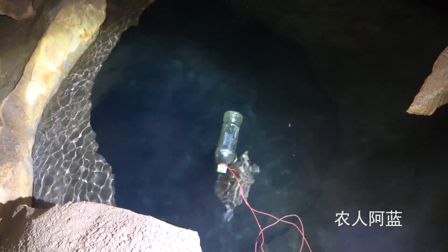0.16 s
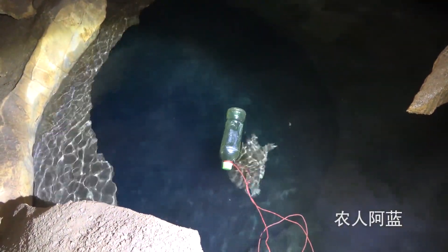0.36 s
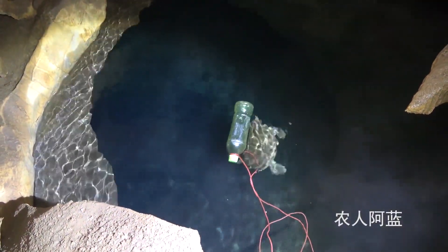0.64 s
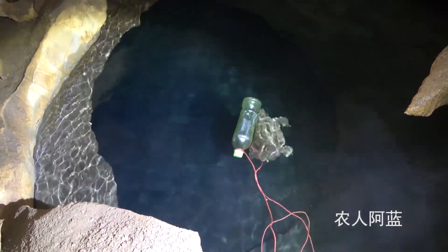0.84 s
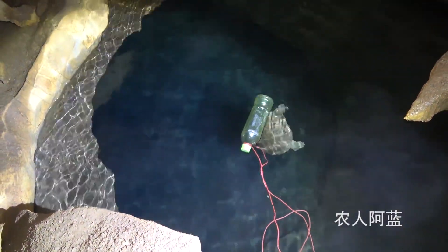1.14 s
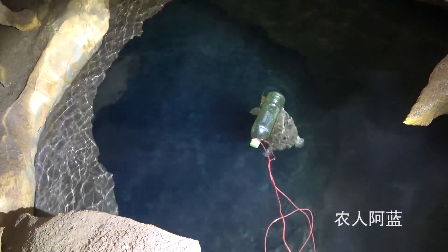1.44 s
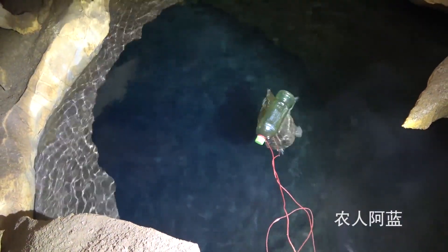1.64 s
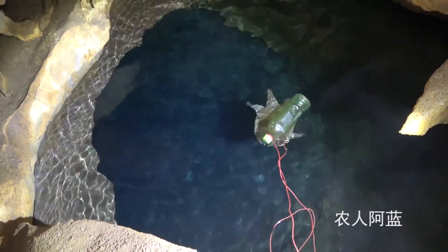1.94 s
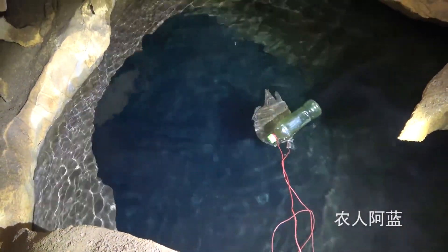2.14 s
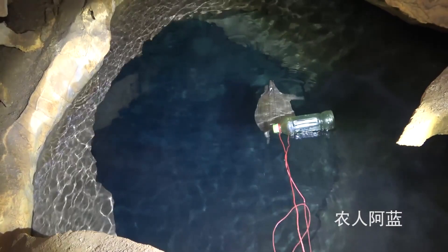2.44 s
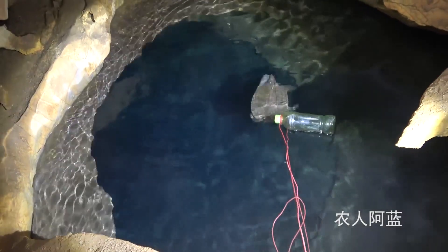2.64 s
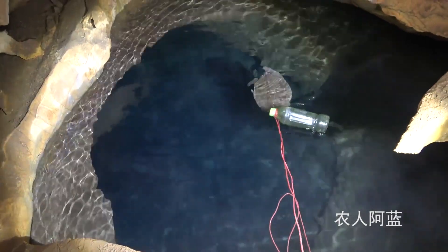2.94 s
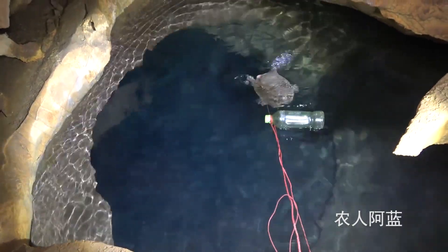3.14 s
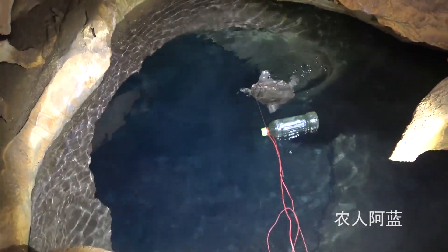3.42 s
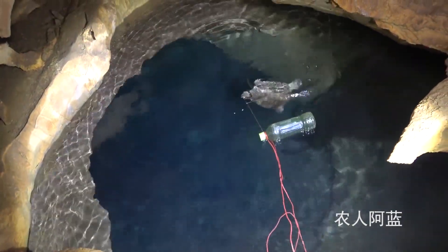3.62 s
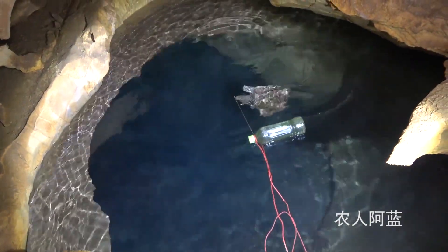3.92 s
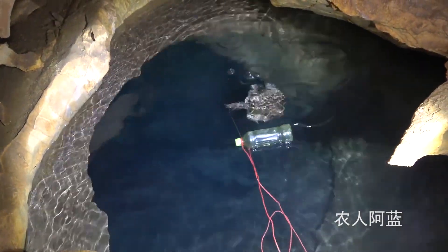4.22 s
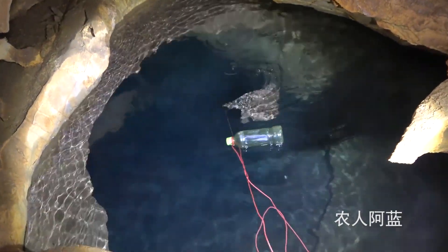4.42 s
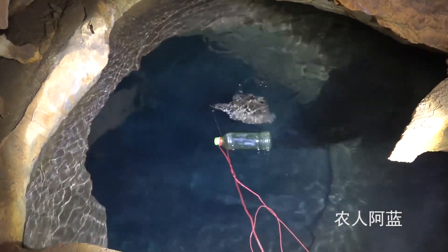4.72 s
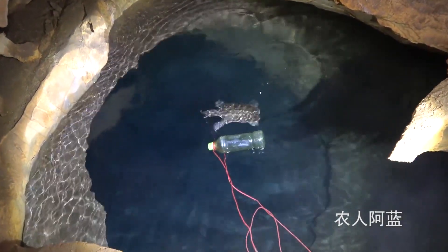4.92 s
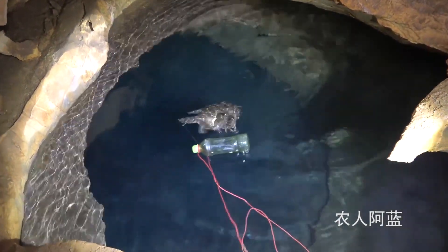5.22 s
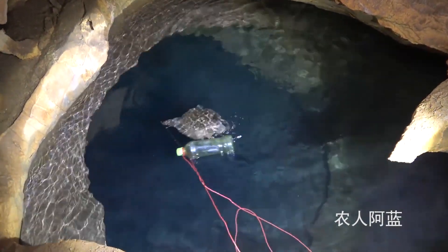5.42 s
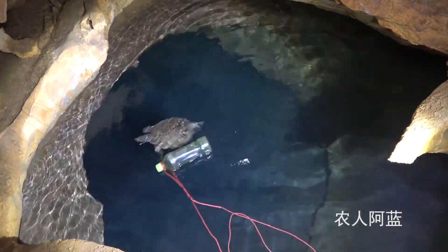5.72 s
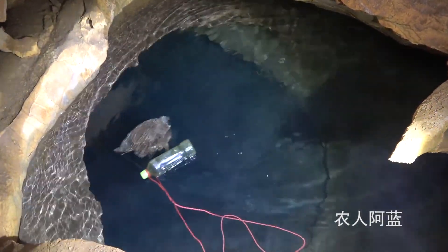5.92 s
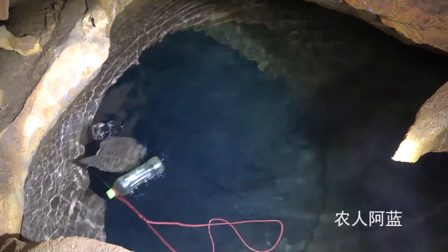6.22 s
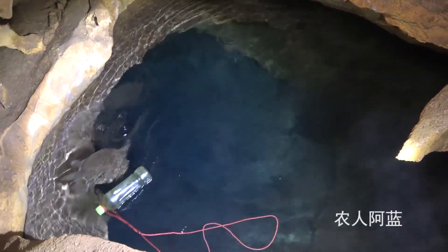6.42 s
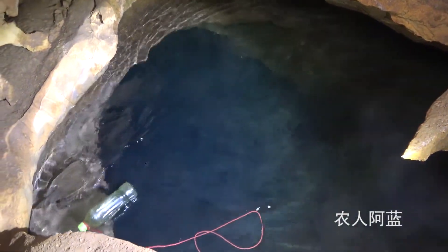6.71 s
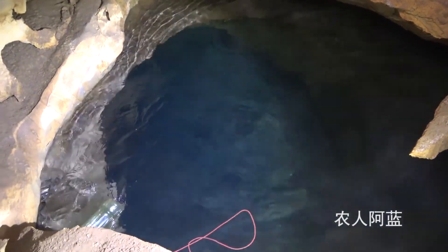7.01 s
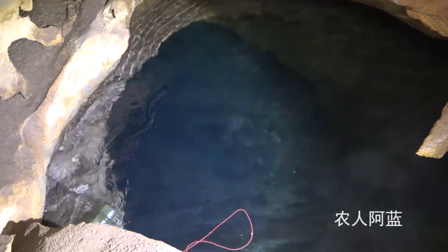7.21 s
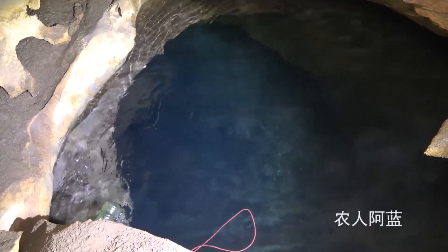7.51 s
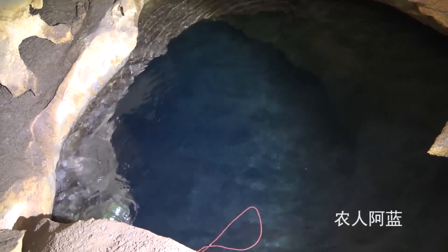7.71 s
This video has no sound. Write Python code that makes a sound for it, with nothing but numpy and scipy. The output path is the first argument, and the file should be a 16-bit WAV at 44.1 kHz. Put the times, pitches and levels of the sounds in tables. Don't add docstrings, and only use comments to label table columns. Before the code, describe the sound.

Water drips, bubbles and plops echo tightly in a rocky hollow as a turtle's strokes break a quiet pool in short bursts.

```python
import sys
import numpy as np
from scipy import signal
from scipy.io import wavfile
from scipy.ndimage import uniform_filter1d

SR = 44100
rng = np.random.default_rng(int(sys.argv[2]) if len(sys.argv) > 2 else 0)


def boost(x):
    u = np.asarray(x, float) / 20
    return 10 ** u


def store_wav(level_fs):
    pcm = np.round(np.clip(np.atleast_2d(level_fs), -1, 1) * 32767)
    wavfile.write(sys.argv[1], SR, pcm.T.astype(np.int16))


N = 346493


def bubble(db, hz, cycles, rise, pan_db, swell_db, bend, neck_cycles, snap_db=-60):
    life = np.arange(0, 1, hz / SR / np.clip(cycles, 2, 300))
    pitch = np.minimum(hz * (1 + rise * life ** bend), SR / 2.6)
    closing = np.minimum((life * cycles + 0.23) / neck_cycles, 1)
    dying = np.minimum((1 - life) * cycles / 1.2, 1)
    level = boost(swell_db * life) * closing * dying
    ring = level / level.max() * np.sin(2 * np.pi * np.cumsum(pitch) / SR)
    ring = np.append(ring, np.zeros(200))
    u = np.arange(1, len(ring) + 1) * hz / SR * 5.5
    snap = boost(snap_db) * np.e * u * np.exp(-u)
    sound = above(ring, 0.94 * hz) + above(snap, 1.05 * hz)
    return boost(db) * sides(pan_db)[:, None] * sound


def above(x, hz):
    return signal.sosfilt(signal.butter(7, min(hz, SR / 2.2), "high", fs=SR, output="sos"), x)


def lean(hz):
    return -1 + 1.5 * abs(np.log2(hz / 1600))


def sides(pan_db):
    return boost(np.array([pan_db / 2, -pan_db / 2]))


def plink(db, hz, cycles, snap_db):
    return bubble(db, hz, cycles, 0.44, lean(hz), -17.0, 2.5, 0.68, snap_db)


# start in seconds, peak level in dB, pitch in Hz, life in cycles, snap in dB.
SMALL_BUBBLES = [(0.1917, -33, 5320, 27, 13), (0.9761, -37, 9700, 10, 15.5), (1.261, -37, 2900, 8, 6),
                 (1.3464, -45, 6050, 8.2, 23), (2.1465, -27, 4490, 21, 11), (2.3087, -31, 8200, 14, 8),
                 (3.203, -39, 6350, 9.7, 13), (3.248, -27.5, 4810, 20, 5), (3.3066, -22, 6900, 14, 24),
                 (4.0376, -23, 4770, 11.6, 6), (4.213, -25, 11500, 9, 9), (4.3803, -25, 4470, 20, 10),
                 (5.3806, -31, 7800, 12, 6), (5.68, -23, 15000, 6.2, 22), (6.3942, -37.5, 6200, 10, 20),
                 (6.413, -25.5, 4330, 17, 11.5), (6.4437, -33, 4770, 15.6, 15.5),
                 (6.612, -30.5, 12800, 5.8, 22), (6.712, -34.5, 4330, 14, 11.5), (6.77, -30, 8900, 12, 14),
                 (7.1036, -25, 6630, 12.5, 12), (7.274, -32, 6750, 13, 12.5),
                 (7.4897, -40, 3950, 7.9, 19.5), (7.5836, -17.5, 9170, 3.6, 6)]
# start in seconds, peak level in dB, pitch in Hz, life in cycles, snap in dB.
MIDDLE_BUBBLES = [(0.807, -21.5, 1696, 17, 2.5), (1.108, -51, 1400, 6, -6), (2.676, -34, 1650, 6.4, 5),
                  (2.688, -43.5, 1356, 32, -1), (2.866, -43, 1520, 33, 10), (3.2045, -36, 1386, 25, 10),
                  (3.2385, -29, 1460, 12.2, -13), (3.271, -40, 1620, 19, 4), (3.297, -38, 1560, 13, 17.5),
                  (3.33, -38, 1010, 5.8, 17), (4.138, -43, 1900, 8.3, 9), (4.28, -39.5, 1380, 30, 6),
                  (4.324, -32.5, 1450, 8.5, -1), (5.386, -41.5, 1230, 13, 12), (6.3464, -52, 1315, 16, 6),
                  (6.3669, -32.5, 1873, 15, -24), (7.2677, -41, 1133, 17, 16), (7.2833, -37, 1390, 16, 5),
                  (7.299, -53, 1170, 15, 9), (7.6099, -40, 1066, 17, 8)]


def pinched_bubbles():
    return [(s, plink(db - 5.5, *shape)) for s, db, *shape in SMALL_BUBBLES + MIDDLE_BUBBLES]


# start in seconds, peak level in
# dB, pitch in Hz, snap in dB.
FAINT_BUBBLES = [(0.358, -51, 6300, 14), (1.2345, -47, 10600, 10), (2.573, -55, 2830, 5),
                 (2.8535, -51, 2420, 17), (2.866, -43, 3100, 13), (3.1681, -43, 8200, -3),
                 (3.4648, -45.5, 6600, 21), (3.5443, -52.5, 4870, 16), (3.588, -54.5, 6110, 24.5),
                 (3.6235, -47.5, 5700, -46), (3.697, -56.5, 4770, 26), (3.739, -42, 11100, 1),
                 (3.8056, -46, 9600, -3), (3.861, -47, 11800, 13), (3.9804, -53, 7920, 1),
                 (4.193, -57, 7600, -5), (5.2214, -50.5, 8000, 23), (5.3648, -43.5, 4740, 16),
                 (5.5246, -46.5, 8700, 19), (5.93, -45, 11700, -19), (6.347, -51.5, 2700, 13),
                 (7.184, -40.5, 9900, 14), (7.3737, -41, 2430, 7), (7.485, -52, 4300, 4),
                 (7.805, -60, 5630, 23), (7.5857, -30, 6400, 10), (7.402, -52, 3000, 19),
                 (5.3975, -47, 2960, 16), (1.105, -51, 4770, 7), (4.59, -54, 6000, 2)]


def faint_bubbles():
    return [(s, plink(db - 3.5, hz, 11.4, snap_db)) for s, db, hz, snap_db in FAINT_BUBBLES]


# start in seconds, peak level in dB, pitch in Hz, life in cycles.
SUBMERGED_BUBBLES = [(1.344, -41.5, 3300, 6.2), (2.675, -36, 2336, 25), (2.699, -46, 2450, 33),
                     (3.2044, -48, 2130, 44), (3.2211, -41.5, 5690, 70), (3.303, -32, 3100, 9.8),
                     (3.3271, -27.5, 2790, 6.1), (4.1805, -48, 7640, 70), (4.2647, -38, 3500, 34),
                     (4.33, -51, 3460, 30), (4.247, -47, 3500, 25), (4.2945, -45, 2290, 20),
                     (4.2963, -44, 5770, 51), (4.3231, -41.5, 2130, 20), (4.541, -43.5, 2452, 62),
                     (5.343, -48, 2630, 18), (5.3844, -43, 2086, 46), (5.4646, -34.5, 2335, 12),
                     (6.4147, -33.5, 2680, 11), (6.5548, -40.5, 2447, 27), (6.7087, -41.5, 3270, 27),
                     (7.231, -45.5, 4000, 24), (7.2755, -31.5, 2100, 13), (7.287, -43, 4070, 35),
                     (7.378, -39.5, 2300, 19), (7.5482, -35.5, 5570, 27), (7.5847, -37.5, 3310, 18)]


def pings():
    return [(s, bubble(db - 5, hz, cycles, 0.015, lean(hz), -22.0, 1.2, 1.5))
            for s, db, hz, cycles in SUBMERGED_BUBBLES]


# start in seconds, peak level in dB, pitch in Hz, life in cycles.
LARGE_POCKETS = [(1.927, -57, 352, 6.2), (2.681, -53, 384, 6.9), (2.719, -53, 400, 2.8),
                 (2.866, -41, 580, 3.7), (2.882, -38.5, 478, 3.2), (3.278, -44, 730, 3.2),
                 (3.295, -37, 670, 2), (3.325, -35, 916, 5.3), (3.38, -37, 650, 4.8), (3.398, -35, 670, 3),
                 (4.2545, -22.5, 550, 3.44), (4.287, -35, 688, 4.5), (6.381, -40, 810, 6.5),
                 (7.075, -53, 742, 10), (7.222, -57, 807, 13), (7.548, -25, 641, 2.34),
                 (7.575, -35, 730, 3.7)]


def plops():
    return [(s, bubble(db - 6, hz, cycles, 0.26, lean(hz), -8.0, 1.6, 2.5))
            for s, db, hz, cycles in LARGE_POCKETS]


# start in seconds, peak level in dB, pitch in Hz, life in cycles,
# rise as a share of the pitch.
SLIDING_POCKETS = [
    (4.206, -47.5, 275, 12, .3),
    (7.518, -51, 600, 16, .3),
    (7.41, -51, 1790, 75, -.09),
    (7.099, -52, 1330, 12, .08),
]


def gulps():
    return [(s, bubble(db, hz, cycles, rise, lean(hz), -2.5, 2.2, 1.4))
            for s, db, hz, cycles, rise in SLIDING_POCKETS]


# start
# in seconds, peak level in dB, pitch in Hz, life in cycles, # rise as a share of the pitch.
FURTHER_BUBBLES = [(3.236, -37, 1330, 23, .42), (3.303, -46, 760, 27, .4), (3.396, -42, 640, 13.1, 0.353),
                   (3.398, -52.5, 1800, 18, .1), (4.243, -46, 420, 9, .5), (4.26, -41, 620, 8, .3),
                   (7.264, -47, 820, 24, 0.61), (7.111, -57, 1270, 39, .03),
                   (7.162, -60, 1350, 41, 0.025), (7.16, -65, 2250, 30, .03),
                   (7.518, -55, 2450, 14.5, .1), (6.8, -54, 7400, 36, 0.044),
                   (2.677, -55, 410, 27, 0.087), (2.674, -57, 980, 9.7, .1), (2.864, -53, 400, 12, 0.49),
                   (3.2, -52.5, 970, 11.6, .1), (2.852, -58, 2100, 14.6, 0.077),
                   (2.543, -63, 430, 19.3, 0.11), (2.575, -64, 860, 29, 0.039),
                   (1.259, -53.5, 3370, 8.5, .2), (1.1, -56, 1150, 6.8, 0.21), (6.588, -50, 10600, 8, .2),
                   (7.9, -51, 8100, 8, .2), (2.1, -58, 9800, 8, .2), (2.326, -54, 3000, 9, .2),
                   (2.327, -54, 5500, 10, .1), (0.4, -62, 3900, 9.7, 0.32), (7.099, -45, 1700, 4.7, 0.46),
                   (7.473, -54, 1680, 36, .12), (7.56, -45, 800, 16, .4), (7.505, -60, 1250, 50, .05),
                   (3.313, -44, 900, 10, .15), (4.332, -50, 1650, 20, -.05), (4.35, -55, 1600, 60, .02),
                   (7.624, -51, 1000, 9, .1), (3.372, -57, 900, 8, 0), (4.28, -52, 1100, 20, .1),
                   (5.055, -64, 190, 5, .5), (7.38, -57, 1000, 6, .4)]


def climbs():
    return [(s, bubble(db, hz, cycles, rise, lean(hz), -4.0, 1.2, 2.5))
            for s, db, hz, cycles, rise in FURTHER_BUBBLES]


# start in seconds, length in seconds, level in dB.
FROTH_BURSTS = [(1.834, 0.19, -73), (2.048, 0.31, -74.5), (5.787, 0.36, -81), (7.493, 0.2, -64.5),
                (2.41, 0.32, -69.5), (2.675, 0.32, -70), (3.129, 0.15, -61.5), (3.214, 0.28, -60),
                (4.263, 0.21, -64.5), (5.02, .15, -65.5), (5.33, 0.27, -70.5), (6.31, 0.19, -63.5),
                (7.028, 0.15, -59), (7.19, 0.27, -67.5), (7.383, 0.29, -65)]


def froth():
    level, t = np.zeros(N), np.arange(N) / SR
    for s, length, db in FROTH_BURSTS:
        fade_s = 0.11
        level += boost(db) * np.clip(np.minimum(t - s, s + length - t) / fade_s, 0, 1)
    kind, swarm = rng.integers(0, 24, N), np.zeros((2, N))
    born = rng.random(N) < 800 / SR
    size = boost(7.16 * np.minimum(rng.exponential(1, N), 3)) * born * level
    for k, hz in enumerate(np.geomspace(1150, 6500, num=24)):
        pan_db = rng.normal(0, 0.6)
        grain = bubble(-1.5 * np.log2(hz / 2000), hz, 4.8, 0.25, pan_db, -29.5, 1.36, 0.45)
        for at in np.flatnonzero(size * (kind == k)):
            swarm[:, at:at + grain.shape[1]] += size[at] * grain
    return boost(-1.8) * swarm


# start in seconds, peak level in dB, pitch in Hz.
SPRAY_SPECKS = [(3.469, -50, 12500), (3.527, -49, 10500), (3.546, -52, 12500), (3.652, -51, 11500),
                (3.7, -49, 11000), (3.74, -47, 12500), (3.749, -44, 10800), (3.863, -47, 11000),
                (1.105, -46, 2630), (6.554, -48, 12000)]


def specks():
    near = np.zeros(N + SR)
    for s, db, hz in SPRAY_SPECKS:
        speck = bubble(db, hz, 4.7, 0.35, 0, -13.0, 1.1, 0.87)[0]
        near[round(s * SR):][:len(speck)] += speck
    return near


# mode in Hz, level in dB, decay time t60 in seconds.
SHELL_MODES = [(1500, -6, 0.013), (4420, 2, 0.0096), (6500, -8, .012), (9500, 4, .004), (11700, 2, 0.0044)]


def casing(db):
    t = np.arange(600) / SR
    modes = [boost(g_db - 60 * t / t60) * np.sin(2 * np.pi * hz * t) for hz, g_db, t60 in SHELL_MODES]
    return boost(db - 5.5) * sum(modes)


def snap_pulse(db, hz):
    u = np.arange(120) * hz / SR * 8.3
    return boost(db + 13.5) * above((1 - u) * np.exp(-u), 500)


# start in seconds, peak level in dB, tone in Hz, echo share from 0 to 1.
CLOSE_TICKS = [(0.5396, -29.5, 2690, 0.16), (0.9765, -45, 2600, 0.75), (1.1048, -43, 2600, 0.3),
               (1.2116, -51, 2570, 0.4), (2.327, -49, 1500, 1), (4.212, -36.5, 2740, 0.38),
               (4.5433, -45, 2800, 0.84), (5.465, -42.5, 2600, 0.47), (6.3674, -43, 2600, 0.86),
               (6.5528, -48, 2600, 0.75), (6.7474, -34.5, 2600, 0.22), (7.3755, -41.5, 2530, 0.86)]


def add_ticks(near, places):
    for k, (s, db, hz, wet) in enumerate(CLOSE_TICKS):
        at, wet = round(s * SR), np.clip(wet, 0, 1)
        near[at:at + 600] += (1 - wet) * casing(db)
        places[k % len(places), :, at:at + 120] += wet * snap_pulse(db, hz)


# frequency in Hz, decay time t60 in seconds.
CAVE_DECAY = [(200, 0.31), (1000, 0.24), (4000, 0.23), (14000, 0.17)]
# frequency in Hz, side against mid in dB.
CAVE_WIDTH = [(200, -21), (600, -11.5), (1500, -14), (4000, -13.5), (10000, -2.5)]
# delay in seconds, level in dB.
ROCK_FACES = [(.0045, -2), (.0085, -4), (.013, -7), (.02, -6), (.031, -13)]
# delay in seconds, level in dB.
WALL_MIRROR = (0.001668, 3.5)


def echo(tail_db=6.5, length=SR // 2):
    taps = np.zeros((2, length))
    at = np.arange(96, length - 16, 16) + rng.integers(0, 16, (2, (length - 97) // 16))
    strength = rng.choice([-1., 1.], at.shape) * boost(0.39 * rng.standard_normal(at.shape))
    np.put_along_axis(taps, at, strength, 1)
    hz, t, z = signal.stft(taps, SR, nperseg=128)
    z *= boost(-60 * t / read(CAVE_DECAY, hz)[:, None])
    z[1] *= boost(read(CAVE_WIDTH, hz))[:, None]
    mid, side = signal.istft(z, SR, nperseg=128)[1][:, :length]
    path = boost(tail_db) * left_right(mid, side) / np.linalg.norm(mid)
    path[:, :60] = 0
    path[:, 0] = 1
    delay_s, mirror_db = WALL_MIRROR
    path[:, round(delay_s * SR)] += boost(mirror_db)
    for s, db in ROCK_FACES:
        path[:, round(s * rng.uniform(0.92, 1.08) * SR)] += boost(db) * rng.choice([-1, 1])
    return path


def read(points, hz):
    f, value = np.transpose(points)
    return np.interp(np.log(hz + 1), np.log(f + 1), value)


def left_right(mid, side):
    return np.array([mid + side, mid - side])


def splashes(count=5):
    sounds = pinched_bubbles() + faint_bubbles() + pings() + plops() + gulps() + climbs()
    places, near = np.zeros((count, 2, N + SR)), specks()
    for k, (s, sound) in enumerate(sounds):
        places[k % count, :, round(s * SR):][:, :sound.shape[1]] += sound
    add_ticks(near, places)
    places[0, :, :N] += froth()
    echoed = sum(signal.oaconvolve(place, echo(), axes=1)[:, :N] for place in places)
    return signal.lfilter(*signal.butter(3, 11400, fs=SR), near[:N] + echoed)


# time in seconds, low slosh lift in dB, spray hiss lift in dB.
PADDLE_STROKES = [(2.75, 10, 1), (1.25, 4, 9.5), (1.95, 12, -3), (2.56, 14, -2), (2.89, 15, 8),
                  (3.19, 10.5, -4), (3.33, 15, 20), (4.223, 19.5, 17), (4.36, 15, -7), (5.08, 18.5, 0),
                  (5.53, 13, 8), (6.13, 10, 0), (6.27, 18.5, -3), (7.09, 14, 10.5), (7.42, 16.5, 3),
                  (7.63, 7, 11.5), (7.76, -0.5, 2), (5.99, 12, -4), (6.62, 0, 11), (3.6, 0, 13)]


def stir(t):
    s, *lifts_db = np.transpose(PADDLE_STROKES)[:, :, None]
    surge, ebb, calm_db = 241, 106, 3.5
    fall_db = np.maximum(surge * (s - t), ebb * (t - s))
    return [np.maximum((db - fall_db).max(0), calm_db) for db in lifts_db]


# time in seconds, lift in dB, half length in seconds.
POOL_HEAVES = [(0.25, 6, 0.43), (1.3, 1.5, 0.26), (3.097, 6, 0.13), (2.05, 2, .2), (7.45, 7, 0.18),
               (7.7, 10, 0.18)]


def heave(hz, t):
    centre_hz, octaves = 103, 0.8
    band = np.exp(-np.log2((hz[:, None] + 1) / centre_hz) ** 2 / octaves ** 2)
    return band * sum(db * np.exp(-((t - s) / half) ** 2) for s, db, half in POOL_HEAVES)


# frequency in Hz, density in dB per Hz.
HUSH_SPECTRUM = [(12, -42), (20, -1), (147, -4), (178, -5), (357, -5), (433, -4), (497, -5), (796, -3),
                 (1780, -12), (2770, -14.5), (4310, -17), (15000, -20.5)]
# frequency in Hz, side against mid in dB.
HUSH_WIDTH = [(60, -13), (240, -3.5), (950, -8), (3770, -7.5), (15000, -1)]
# frequency in Hz, width in Hz, lift in dB.
HOLLOW_MODES = [(71.6, 17, 4.5), (155, 30, 1.5), (511, 20, 6.5), (765.4, 37.5, 8.5), (1018, 51, 10.5),
                (1225, 134, 5.5)]
# frequency in Hz, share from 0 to 1.
SLOSH_SHARE = [(75, 0), (130, 0.82), (350, 0.91), (800, 0.19)]


def hush():
    frames, hz = N // 256 + 5, np.fft.rfftfreq(1024, 1 / SR)
    a, b, c, d, patches = rng.standard_normal((frames, 513, 5)).T
    patches = uniform_filter1d(uniform_filter1d(patches, 12, 0), 14, 1)
    patches_db = 1.8 * patches / patches.std()
    t = np.arange(frames) * 256 / SR
    low_db, high_db = stir(t)
    low = np.clip(read(SLOSH_SHARE, hz), 0, 1)[:, None] * low_db
    high = np.clip(np.log2(hz / 2500 + 1e-9), 0, 1)[:, None] * high_db
    z = np.array([a + 1j * b, (c + 1j * d) * boost(read(HUSH_WIDTH, hz))[:, None]])
    modes_db = sum(db / (1 + (2 * (hz - f) / width) ** 2) for f, width, db in HOLLOW_MODES)
    steady_db = (read(HUSH_SPECTRUM, hz) + modes_db)[:, None]
    z *= boost(steady_db + low + high + heave(hz, t) + patches_db)
    mid, side = signal.istft(z, nperseg=1024, noverlap=768)[1][:, :N]
    return boost(-59.5) * left_right(mid, side) / mid.std()


# frequency in Hz, width in Hz, rms level in dB.
DEEP_MODES = [(73, 10, -76), (146.5, 13, -77), (203.6, 13, -82), (300.5, 14, -85.5)]


def drone():
    total = 0
    for hz, width, db in DEEP_MODES:
        held = signal.lfilter(*signal.iirpeak(hz, hz / width, SR), rng.standard_normal(N))
        total = total + boost(db) * held / held.std()
    return total


# time in seconds, level in dB, left-right difference in dB.
LAMP_WHINE = [(0.0, -54.5, 7.0), (0.79, -53, 3.5), (1.73, -53, 2), (1.88, -57, 4), (2.06, -55.5, 7.5),
              (2.41, -55, 5), (2.67, -60, 8), (2.84, -55.5, 7), (3.26, -56, 3), (3.46, -63, 9.5),
              (3.81, -57, 6), (4.26, -56, 3), (4.68, -53.5, 7.0), (5.56, -55.5, 3), (6.69, -61.5, 14),
              (6.87, -58.5, 9), (7.64, -53.5, 8), (7.86, -56, 11)]


def whine():
    s, db, pan_db = np.transpose(LAMP_WHINE)
    t = np.arange(N) / SR
    tone = np.sqrt(2) * boost(np.interp(t, s, db)) * np.sin(2 * np.pi * 15684.5 * t)
    return tone * sides(np.interp(t, s, pan_db))


def scene():
    return splashes() + hush() + whine() + drone()


def band_limit(x):
    return signal.sosfilt(signal.butter(12, 17170, fs=SR, output="sos"), x)


def record(dry):
    low_pass = signal.firwin(801, 15830, window=("kaiser", 9), fs=SR)
    limited = signal.oaconvolve(dry, low_pass[None], "same")
    return band_limit(limited)


dry = scene()
out = record(dry)
store_wav(out)
```